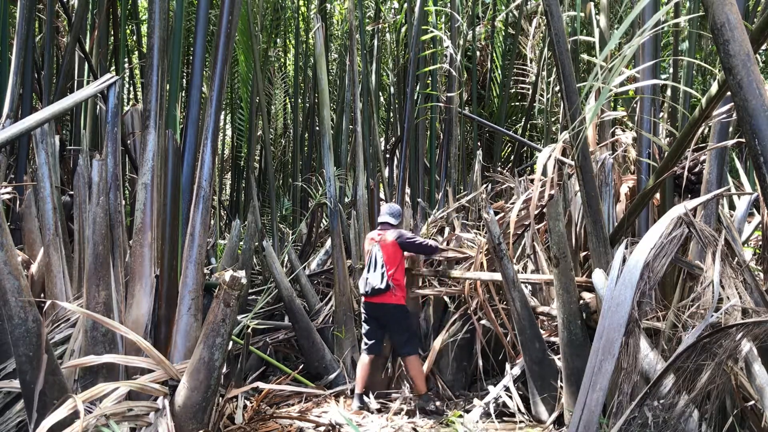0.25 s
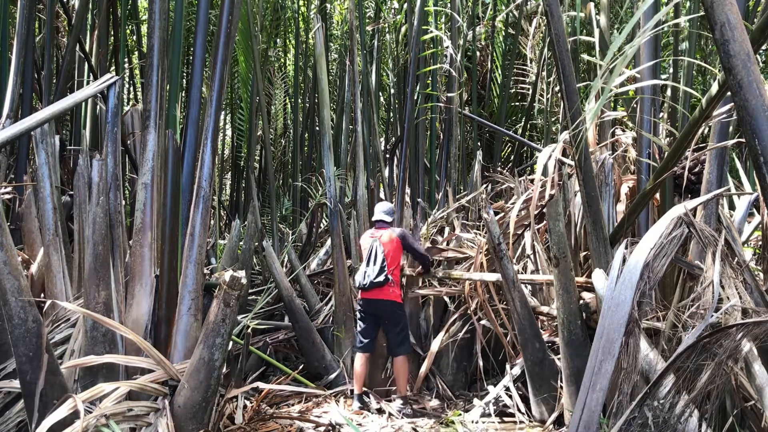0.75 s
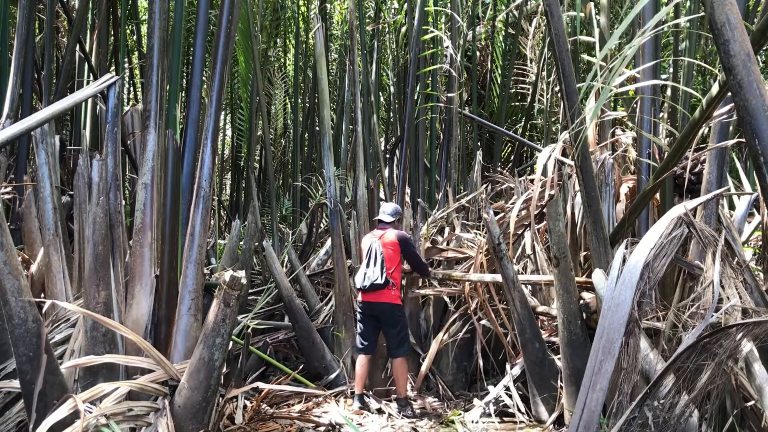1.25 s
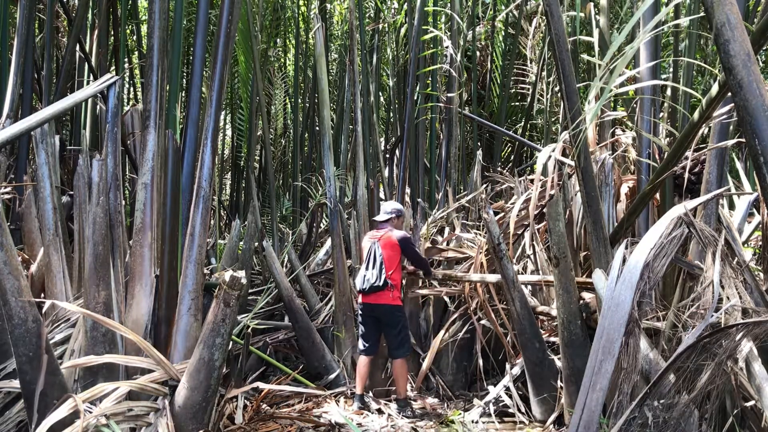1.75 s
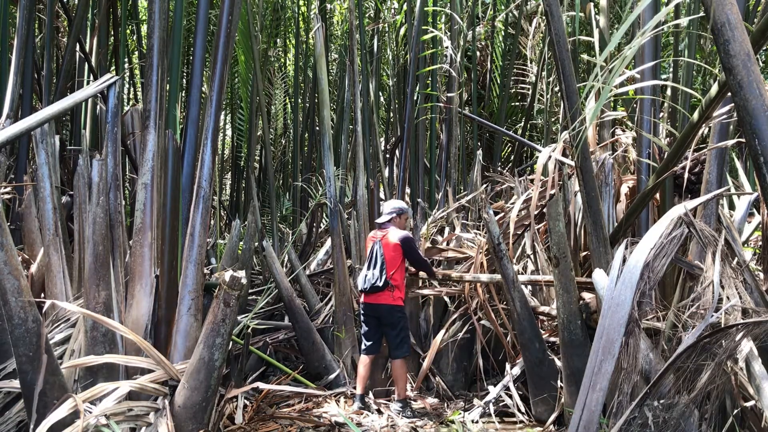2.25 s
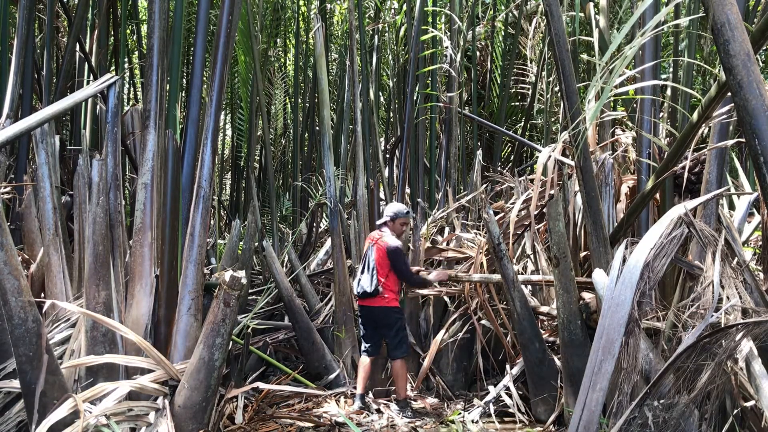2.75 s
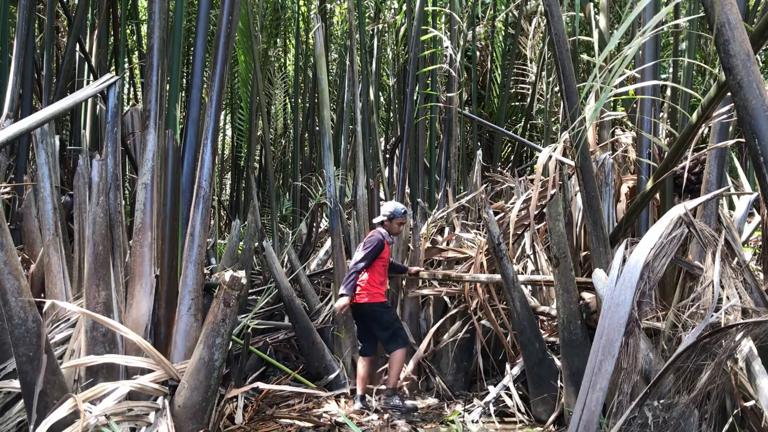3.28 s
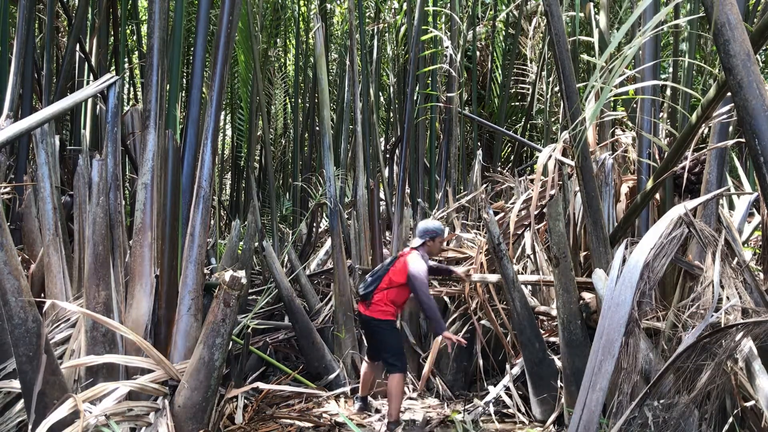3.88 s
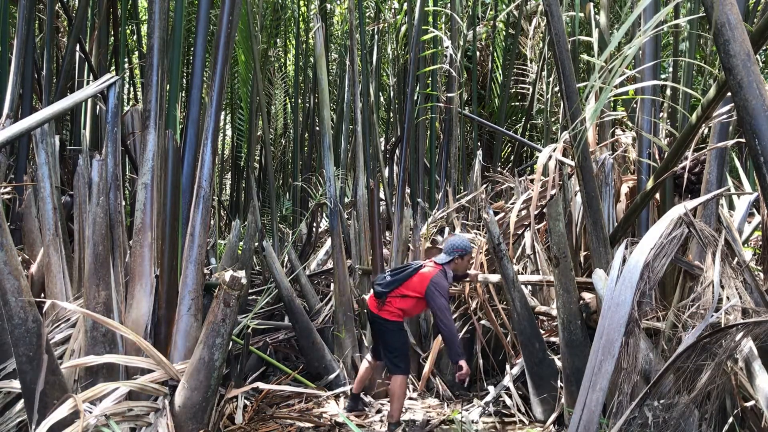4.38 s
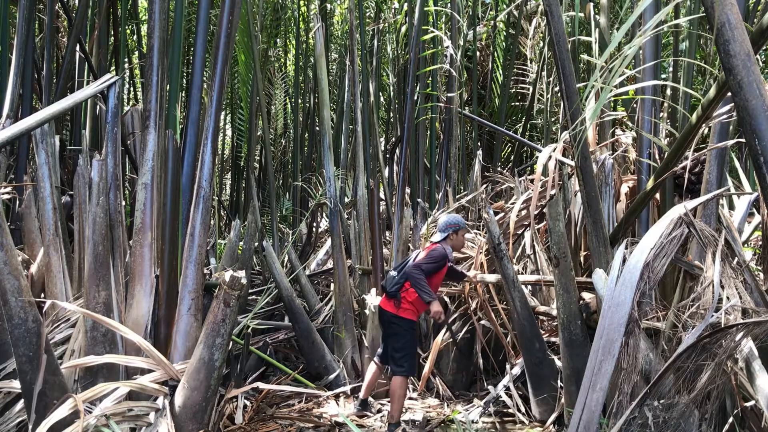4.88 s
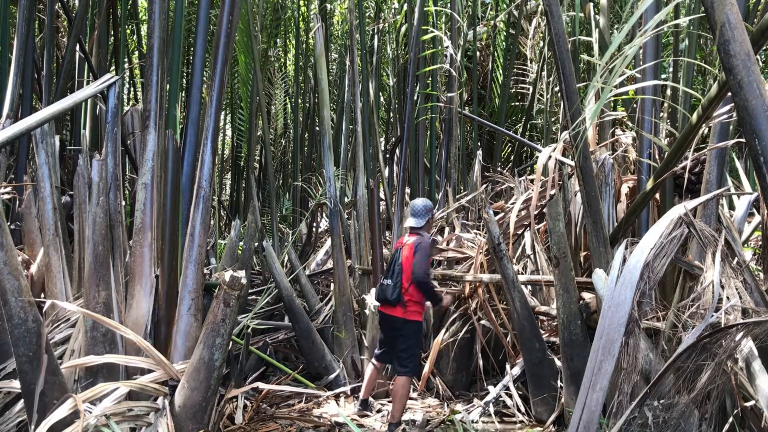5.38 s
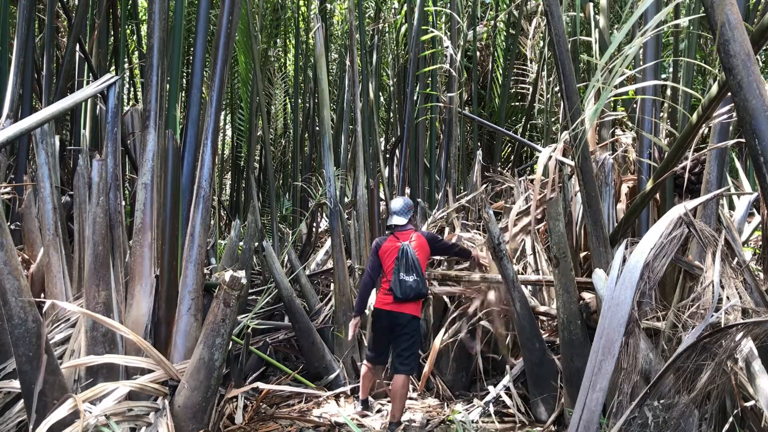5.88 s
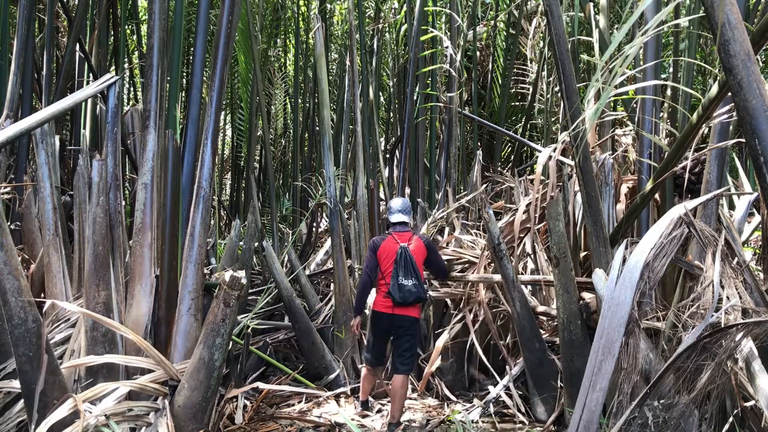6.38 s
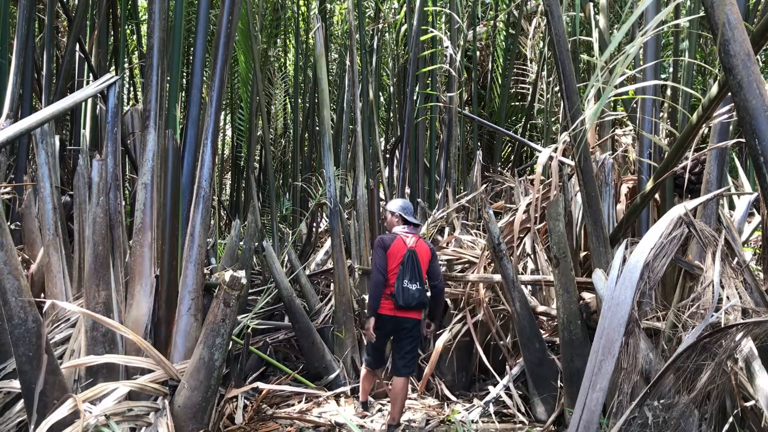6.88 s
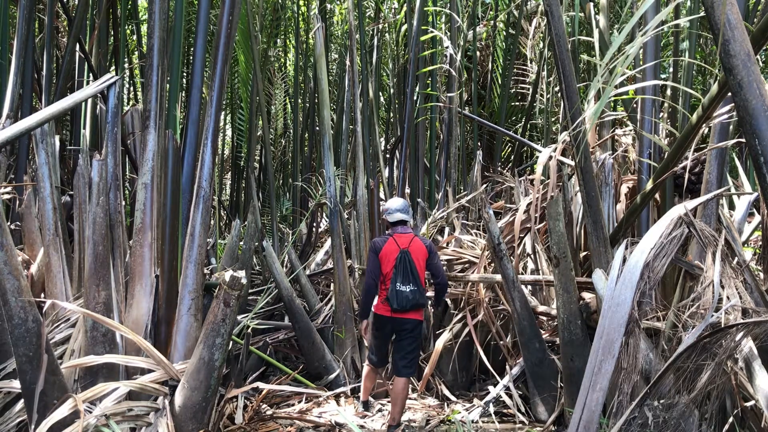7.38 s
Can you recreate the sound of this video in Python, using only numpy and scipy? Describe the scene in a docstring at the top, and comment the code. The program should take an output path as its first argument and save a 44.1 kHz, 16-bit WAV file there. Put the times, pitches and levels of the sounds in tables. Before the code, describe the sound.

Five chops bite into a dry palm stalk, the second the sharpest and the last two duller. Dry fronds are dragged and trodden, crackling, with small snaps and a brief hollow scrape. Then the stalk gives way in a loud splintering crack, followed by a fading rustle. The surrounding stems give each snap a short hissing tail, while a single microphone picks up soft wind rumble and far foliage.

```python
"""A dry stalk is chopped five times and, after some shifting of dead fronds, broken in one loud crack.
Each blow tears a burst of fibres and thuds in stalk and roots; leaflets crackle, ribs knock and scrape.
A single microphone stands in a thicket of palms, where the stems all round scatter every snap into
a short hissing tail. Leaves hiss in the distance and wind rumbles on the microphone."""
import sys
import numpy as np
from scipy import signal
from scipy.fft import rfft, irfft, next_fast_len
from scipy.io import wavfile

SR = 44100
rng = np.random.default_rng(int(sys.argv[2]) if len(sys.argv) > 2 else 0)


def bounce(signal):
    """Save signal as a 16-bit WAV file at the path given by the first command-line argument."""
    frames = np.transpose(np.atleast_2d(signal))
    limited = np.clip(frames, -1, 1)
    pcm = np.round(limited * 32767).astype(np.int16)
    wavfile.write(sys.argv[1], SR, pcm)


N = 336924

# five chops into the stalk, then the steps in which it gives way:
# (time [s], splinter level [dB], thud level [dB], splintering t60 [s], thud tilt [dB/octave])
BLOWS = [(0.3602, -26, -34.5, 0.077, -2.5), (0.7394, -17.5, -37.5, 0.061, -4),
         (1.2098, -25.5, -34.5, 0.083, -3), (1.6278, -33, -33.5, 0.13, 1), (2.0486, -36, -34.5, 0.14, 0.5),
         (5.8461, -25, -58, 0.27, 0), (5.8556, -15, -32, .12, 2), (5.8629, -20, -44, 0.076, -2),
         (5.872, -27.5, -44, 0.19, 1), (5.891, -25, -49, 0.13, -2), (5.912, -24.5, -46, 0.16, 5)]


def from_db(db):
    """Decibels to gain."""
    return 10 ** (np.asarray(db) / 20)


def rms_one(x):
    """Scale to unit rms."""
    return x / np.sqrt(np.mean(x ** 2) + 1e-20)


def in_time(rows):
    """Interpolate each column after the time column at every sample."""
    times, *columns = np.transpose(rows)
    return [np.interp(np.arange(N) / SR, times, column) for column in columns]


def at_hz(points, hz):
    """Read a table on a log-frequency axis."""
    frequencies, values = np.transpose(points)
    return np.interp(np.log(hz), np.log(frequencies), values)


def filtered(x, db_at):
    """Apply a smooth gain, given in dB as a function of Hz."""
    size = next_fast_len(len(x) + 512)
    hz = np.maximum(np.arange(size // 2 + 1) * SR / size, 1)
    return irfft(rfft(x, size) * from_db(db_at(hz)), size)[:len(x)]


def coloured(x, spectrum):
    """Shape a sound by a spectrum; rms 1."""
    return rms_one(filtered(x, lambda hz: at_hz(spectrum, hz)))


def band_of(x, low, high):
    """Butterworth band-pass, edges in Hz."""
    return signal.sosfilt(signal.butter(2, [low, high], "band", fs=SR, output="sos"), x)


def add(out, time, piece):
    """Mix a piece in at a time in seconds."""
    at = round(time * SR)
    out[at:at + len(piece)] += piece[:N - at]


def drift(rate):
    """Random wander of rms 1, changing about rate times a second."""
    step = 40
    r = np.exp(-2 * np.pi * rate * step / SR)
    slow = signal.lfilter([1], [1, -2 * r, r * r], rng.standard_normal(N // step + 2002))[2000:]
    return np.interp(np.arange(N) / step, np.arange(len(slow)), rms_one(slow))


def crackle(per_s, spread_db, cycles, hiss):
    """Fibres tear at random, each ringing a few cycles at its own pitch, over a share of hiss; rms 1."""
    sizes = from_db(spread_db * np.minimum(rng.exponential(1, N), 5)) * rng.choice([-1, 1], N)
    clicks = sizes * (rng.random(N) < per_s / SR)
    pitch_index, out = rng.integers(0, 14, N), 0
    for k, hz in enumerate(np.geomspace(500, 15000, num=14)):
        r = from_db(-60 * hz / (cycles * SR))
        poles = [1, -2 * r * np.cos(2 * np.pi * hz / SR), r * r]
        ring = signal.lfilter([1, 0, -1], poles, clicks * (pitch_index == k) + 1e-18)
        out = out + (1 - r * r) / 2 * ring
    return rms_one(rms_one(out) + hiss * rng.standard_normal(N))


def far_leaves():
    """Distant leaves blend into a steady hiss."""
    # spectrum of the far foliage: (frequency [Hz], relative density [dB])
    spectrum = [(65, -5.5), (110, -3), (130, -8.5), (205, -16), (285, -11.5), (488, -15), (967, -14),
                (3150, -20.5), (6500, -24.5), (13100, -36.5), (15500, -63)]
    return from_db(-56) * coloured(rng.standard_normal(N), spectrum)


def wind():
    """Gusts rumble on the microphone."""
    # spectrum of the rumble: (frequency [Hz], relative density [dB])
    spectrum = [(15, -70), (28, -34), (36, 4), (45, -7.5), (60, -1.5), (78, -0.5), (95, -14), (115, -30),
                (160, -54)]
    # rise and fall of the wind: (time [s], level [dB])
    gusts = [(0.0, -53.5), (1.06, -54.5), (1.96, -51.5), (2.36, -56), (3.02, -51.5), (3.74, -53),
             (4.91, -50.5), (5.23, -50), (6.92, -51), (7.64, -54)]
    return from_db(in_time(gusts)[0]) * coloured(rng.standard_normal(N), spectrum)


def frond_movement():
    """Gains of leaflets, their treble and ribs: soft stirring plus swishes, added as powers."""
    # fronds stirring all the time: (time [s], leaflet level [dB], rib level [dB])
    stirring = [(0, -56.5, -56.5), (0.3, -53.5, -54.5), (0.95, -56.5, -56.5), (1.45, -59.5, -55.5),
                (2.0, -59.5, -56.5), (2.6, -56.5, -57.5), (3.0, -58, -57.5), (4.1, -59.5, -57.5),
                (4.8, -58, -59), (5.3, -59.5, -58.5), (5.8, -62, -71), (6.6, -60, -72), (7.0, -62.5, -59),
                (7.4, -63, -62), (7.64, -66, -57)]
    # fronds dragged, trodden or falling:
    # (time at full level [s], hold [s], t60 [s], leaflet level [dB], treble lift [dB], rib level [dB])
    swishes = [(0.43, 0.14, 1, -52.5, 2, -59), (1.014, 0.023, 0.54, -59.5, 1.5, -70),
               (2.454, 0.08, 0.68, -69, -2, -72), (3.114, 0.06, 0.5, -53.5, 11, -57),
               (3.194, 0.14, 0.44, -51, 2.5, -54.5), (3.314, 0.022, 0.25, -54, 0.5, -66),
               (3.502, 0.062, 0.3, -47.5, 1.5, -55.5), (3.588, 0.026, 0.79, -44.5, -3.5, -49.5),
               (3.775, 0.044, 0.6, -53, 1.5, -51.5), (3.923, 0.02, 0.9, -61.5, 0.5, -58),
               (4.236, 0.056, 0.4, -54.5, -2.5, -61), (4.8, 0.03, 0.6, -59, -2, -62),
               (5.425, 0.03, 0.57, -59, 2, -77), (5.988, 0.046, 0.88, -36.5, 2, -45),
               (6.126, 0.023, 0.6, -44.5, -0.5, -53.5), (6.24, 0.054, 0.5, -50, 0, -57),
               (6.347, 0.02, 0.89, -57.5, 0, -66), (6.498, 0.03, 0.6, -64, 3, -68),
               (6.767, 0.018, 0.3, -52.5, -2, -61), (7.47, 0.09, 0.64, -52.5, -2, -62)]
    stirring_treble_db, rise_db_per_s = -5, 186
    leaflets_db, ribs_db = in_time(stirring)
    power = from_db([leaflets_db, leaflets_db + stirring_treble_db, ribs_db]) ** 2
    t = np.arange(N) / SR
    for time, hold, t60, db, lift_db, rib_db in swishes:
        rise_db = -rise_db_per_s * np.maximum(time - t, 0)
        decay_db = -60 * np.maximum(t - time - hold, 0) / t60
        envelope = from_db(np.maximum(rise_db + decay_db, -100))
        power = power + np.outer(from_db([db, db + lift_db, rib_db]), envelope) ** 2
    return np.sqrt(power)


def rustle():
    """Leaflets crackle brightly and ribs knock dully, in loose clumps."""
    # spectrum of dry leaflets: (frequency [Hz], relative density [dB])
    leaflet_spectrum = [(880, -47), (1500, 3.5), (2520, 3.5), (2800, 5.5), (6750, 1), (7520, -0.5),
                        (9790, -4), (15500, -10.5)]
    # spectrum of frond ribs: (frequency [Hz], relative density [dB])
    rib_spectrum = [(250, -7.5), (500, -6), (800, -4.5), (1300, -4), (2200, -13.5), (4000, -26)]
    treble_hz = 6000
    leaflet_gain, treble_gain, rib_gain = frond_movement()
    grains_per_s = 4000 * from_db(5.1 * drift(rate=12))
    grains = coloured(crackle(grains_per_s, spread_db=1.5, cycles=2.7, hiss=1.74), leaflet_spectrum)
    treble = filtered(grains, lambda hz: -10 * np.log10(1 + (treble_hz / hz) ** 4))
    leaflets = leaflet_gain * grains + (treble_gain - leaflet_gain) * treble
    ribs = rib_gain * coloured(crackle(per_s=900, spread_db=3.5, cycles=7.4, hiss=2.17), rib_spectrum)
    return from_db(2.2 * drift(rate=22)) * leaflets + from_db(1.34 * drift(rate=27.6)) * ribs


def bursts(events):
    """Short bursts of noise, each in a band of its own; high ones die sooner."""
    out, t = np.zeros(N), np.arange(SR // 5) / SR
    rise_s, bite, bite_t60 = 0.00067, 0.87, 0.0052
    attack = (1 - np.exp(-t / rise_s)) * (1 + bite * from_db(-60 * t / bite_t60))
    for time, db, centre_hz, octaves in events:
        white, width = rng.standard_normal(len(t)), max(octaves, 0.1)
        band = filtered(white, lambda hz: np.maximum(-4 * (np.log2(hz / centre_hz) / width) ** 2, -60))
        t60 = 0.065 * (centre_hz / 1000) ** -0.31
        add(out, time, rms_one(band) * attack * from_db(db - 60 * t / t60))
    return out


def frond_snaps():
    """Single leaflets and ribs snap and knock; at the big crack the stalk rings low."""
    # small snaps in the fronds, plus the stalk's low ring at the big crack (5.859 s): # (time [s], level [dB],
    # centre [Hz], width [octaves])
    snaps = [(0.209, -41.5, 1600, 1.04), (0.2711, -49, 13500, 0.3), (0.53, -44.5, 1300, 0.25),
             (0.5457, -46, 1420, 0.3), (0.583, -33.5, 5300, 0.15), (0.623, -48, 8000, 1.0),
             (0.647, -31, 7040, 1.3), (1.097, -45, 4560, 0.5), (1.7003, -40, 2080, 1.3),
             (2.04, -40, 1490, 1.4), (2.4667, -56, 11000, 0.6), (2.9115, -50, 4200, 0.3),
             (2.9676, -41, 9000, 3), (3.021, -42, 3080, 0.9), (3.072, -30, 9580, 1.2),
             (3.0868, -30.5, 3730, 1.6), (3.15, -36, 4080, 1.7), (3.171, -40, 1300, 0.21),
             (3.175, -35, 2410, 1.1), (3.2995, -33, 7700, 0.65), (3.3433, -43, 3470, 0.4),
             (3.5059, -37, 5260, 0.66), (3.5257, -34, 2100, 0.13), (3.5526, -39, 2050, 0.18),
             (3.5793, -38, 2120, 1.2), (3.597, -39, 1920, 0.9), (3.6564, -43, 10000, 0.6),
             (3.691, -43, 7260, 0.22), (3.705, -46.5, 570, 0.1), (3.7865, -37, 715, 0.15),
             (3.813, -37, 3280, 0.6), (3.83, -43, 2280, 0.3), (3.8503, -42.5, 9200, 0.26),
             (3.928, -50, 11340, 0.4), (4.255, -48, 5000, 0.5), (4.299, -47, 6000, 0.54),
             (5.859, -23.5, 850, 0.4), (6.003, -29, 2800, 1.0), (6.237, -41, 3720, 0.5),
             (6.2934, -39.5, 3540, 0.3), (6.352, -50.5, 6000, 1.2), (6.485, -42, 6760, 1.4),
             (6.6326, -52, 10170, 0.67), (6.779, -44, 5700, 0.5), (7.2046, -57, 7000, 0.6),
             (7.443, -49, 2930, 0.4), (7.4955, -46.5, 9250, 0.6)]
    return bursts(snaps)


def thicket(x):
    """Swaying stems scatter each band into fresh noise whose power builds for a moment, then dies."""
    # decay among the stems: (frequency [Hz], t60 [s])
    decay_times = [(200, 0.41), (700, 0.32), (2000, 0.22), (5000, 0.57), (10000, 0.38), (15000, 0.15)]
    out, edges = 0, np.geomspace(150, 19000, num=12)
    white = rng.standard_normal((2, N))  # neighbouring bands get unrelated noise
    build_up = np.exp(-1 / (0.01 * SR))  # 10 ms
    for k, (low, high) in enumerate(zip(edges, edges[1:])):
        t60 = at_hz(decay_times, np.sqrt(low * high))
        fade = from_db(-120 / (SR * t60))  # power kept per sample
        power = signal.lfilter([1 - fade], [1, -fade], band_of(x, low, high) ** 2 + 1e-18)
        power = signal.lfilter([1 - build_up], [1, -build_up], power)
        out = out + np.sqrt(power) * rms_one(band_of(white[k % 2], low, high))
    return out


def splinters():
    """Each blow tears a burst of fibres, sharpest at its start; harder blows are brighter."""
    # spectrum of splintering fibres: (frequency [Hz], relative density [dB])
    spectrum = [(240, -1), (400, -21), (715, -9.5), (1020, -5), (1910, -3), (2060, -6.5), (2510, -1.5),
                (2790, -4), (3850, -1.5), (6780, -4.5), (15500, -8.5)]
    bite, bite_t60, no_tilt_db = 0.34, 0.011, -22.5
    fibres = coloured(crackle(per_s=8300, spread_db=1.0, cycles=2.44, hiss=0.33), spectrum)
    out, t = np.zeros(N), np.arange(SR // 2) / SR
    attack = 1 + bite * from_db(-60 * t / bite_t60)
    for time, db, _, t60, _ in BLOWS:
        at = round(time * SR)
        tilt = 0.27 * (db - no_tilt_db)  # dB per octave
        tear = filtered(fibres[at:at + len(t)], lambda hz: tilt * np.log2(hz / 4000))
        add(out, time, tear * attack * from_db(db - 60 * t / t60))
    return out


def thuds():
    """Each blow thuds in stalk and roots: bands of noise swell and die, the low ones lasting longer."""
    # bands of a thud: (centre [Hz], width [octaves], relative level [dB], rise [s], t60 [s])
    bands = [(340, 0.61, 1.5, 0.012, 0.14), (208, 0.91, -1, 0.013, 0.19), (119, 1, -0.5, 0.042, 0.24),
             (67, 0.83, -5.5, 0.019, 0.27)]
    out, t = np.zeros(N), np.arange(SR // 2) / SR
    for time, _, thud_db, _, tilt in BLOWS:
        for hz, octaves, band_db, rise, t60 in bands:
            white, edge_ratio = rng.standard_normal(2 * len(t)), 2 ** (octaves / 2)
            band = rms_one(band_of(white, hz / edge_ratio, hz * edge_ratio)[len(t):])
            swell = 1 - np.exp(-(t / rise) ** 2)
            db = thud_db + band_db + tilt * np.log2(hz / 200)
            add(out, time, band * swell * from_db(db - 60 * t / t60))
    return out


def stalk_knocks():
    """Every blow knocks the stalk, which sounds in two narrow bands."""
    # bands of the stalk: (centre [Hz], level relative to the splinters [dB], width [octaves])
    bands = [(970, -18, 0.2), (3140, -8, 0.19)]
    return bursts([(time, db + band_db, hz, octaves)
                   for time, db, *_ in BLOWS for hz, band_db, octaves in bands])


def rib_scrape():
    """A hollow rib is dragged; its slips ring in one resonance whose note sinks and rises."""
    # course of the drag: (time [s], level [dB], centre [Hz])
    drag = [(3.55, -75, 1100), (3.66, -57, 810), (3.69, -51, 850), (3.71, -51, 575), (3.79, -62, 700),
            (3.83, -55, 600), (3.86, -48.5, 756), (3.93, -73, 1050)]
    width_hz, block = 140, 128
    db, hz = in_time(drag)
    slips = crackle(per_s=620, spread_db=1.5, cycles=1.8, hiss=0.77)
    out, state = np.zeros(N), np.zeros(2)
    r = np.exp(-np.pi * width_hz / SR)
    for i in range(round(drag[0][0] * SR), round(drag[-1][0] * SR), block):
        poles = [1, -2 * r * np.cos(2 * np.pi * hz[i] / SR), r * r]
        out[i:i + block], state = signal.lfilter([1, 0, -1], poles, slips[i:i + block], zi=state)
    return from_db(db) * out / np.sqrt(np.mean(out[out != 0] ** 2))


def scene():
    """Blows and fronds among the stems, far leaves and wind, all at one spot: both channels alike."""
    cracks, low_thuds = splinters(), thuds()
    sharp = cracks + stalk_knocks() + frond_snaps()
    ambience = far_leaves() + wind()
    scatter = from_db(-7.5) * thicket(sharp)
    mono = sharp + scatter + low_thuds + rustle() + rib_scrape() + ambience
    return np.array([mono, mono])


def record(dry):
    """The microphone housing dips the treble; the recorder cuts deep bass, rounds peaks, cuts the top."""
    # narrow dips from the housing: (centre [Hz], width [Hz], gain [dB])
    dips = [(5000, 340, -3), (7570, 850, -2.5), (10530, 440, -4)]
    low_cut_hz, high_cut_hz, ceiling = 36.6, 15760, 0.85
    low_cut = signal.butter(8, low_cut_hz, "high", fs=SR, output="sos")
    high_cut = signal.ellip(12, 0.3, 80, high_cut_hz, fs=SR, output="sos")

    def housing_db(hz):
        return sum(db * np.exp(-((hz - centre) / width) ** 2) for centre, width, db in dips)

    mic = np.array([filtered(channel, housing_db) for channel in dry])
    rounded = ceiling * np.tanh(signal.sosfilt(low_cut, mic) / ceiling)
    return signal.sosfilt(high_cut, rounded)


dry = scene()
out = record(dry)
bounce(out)
```